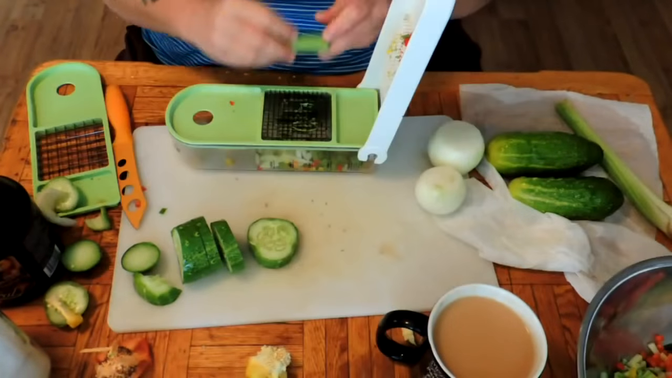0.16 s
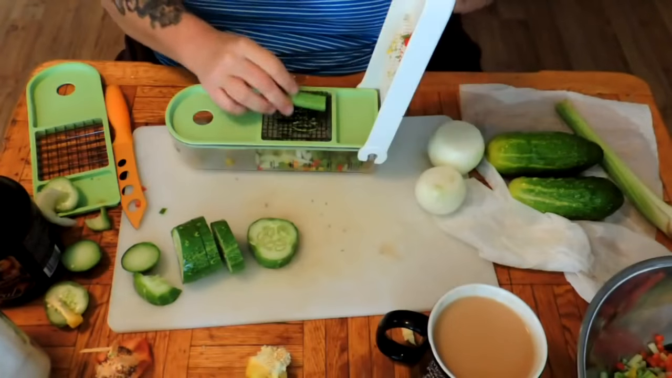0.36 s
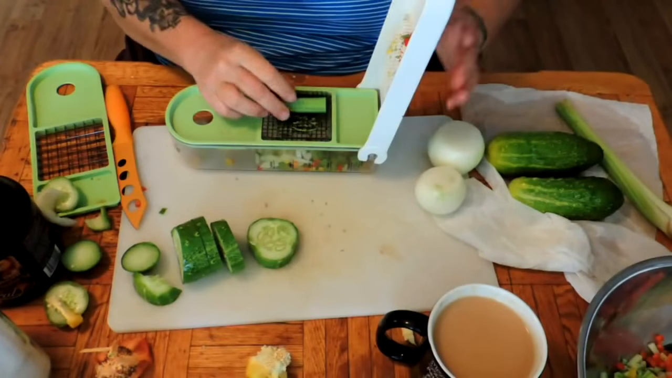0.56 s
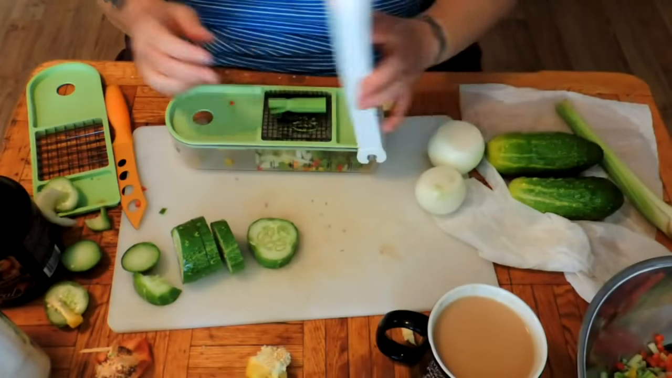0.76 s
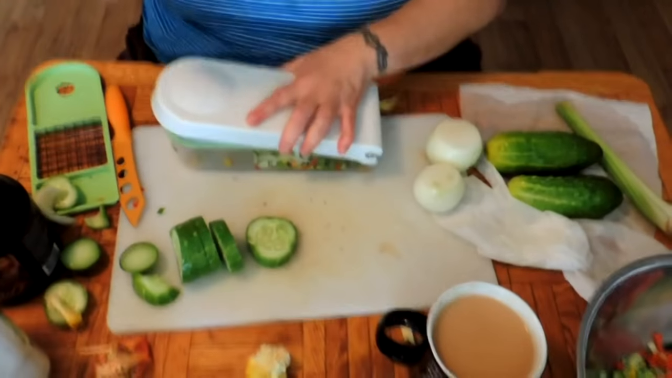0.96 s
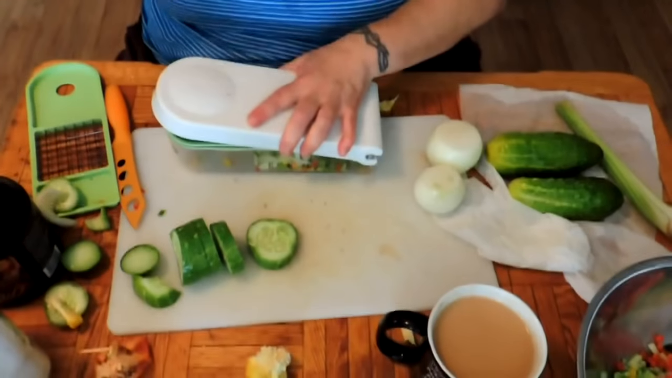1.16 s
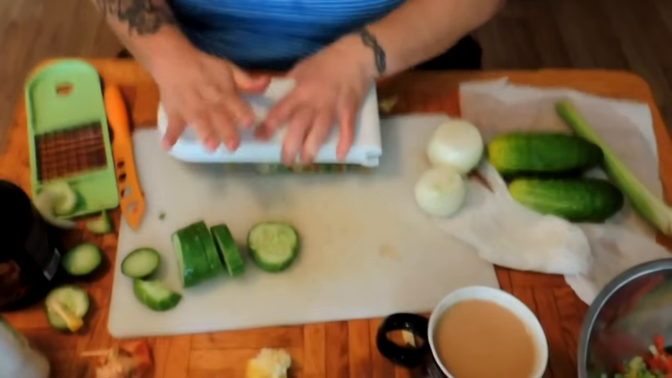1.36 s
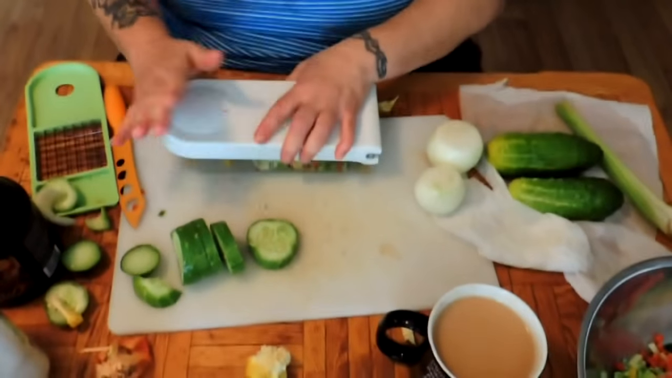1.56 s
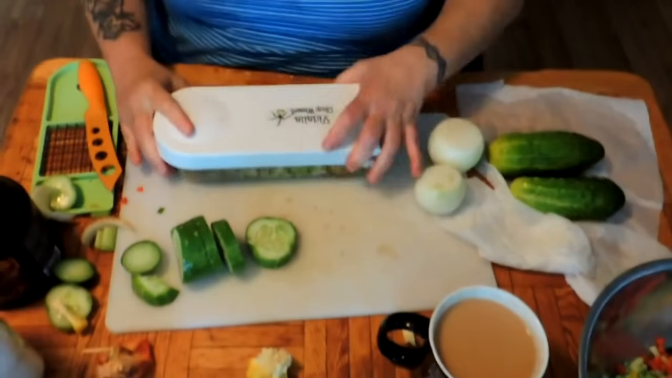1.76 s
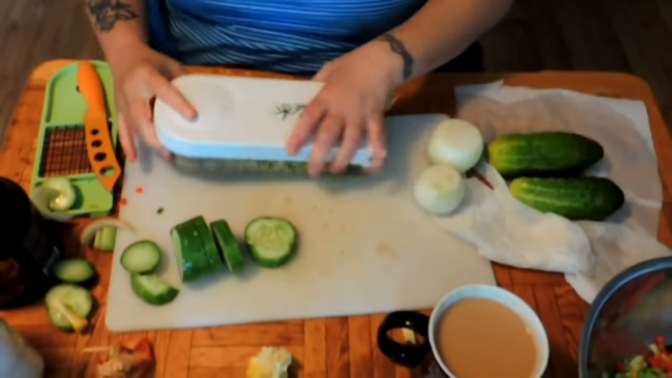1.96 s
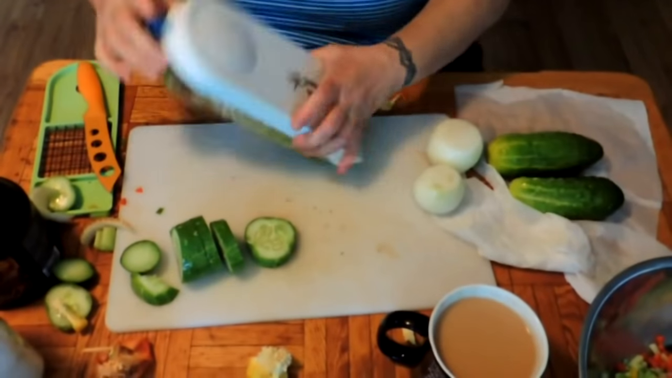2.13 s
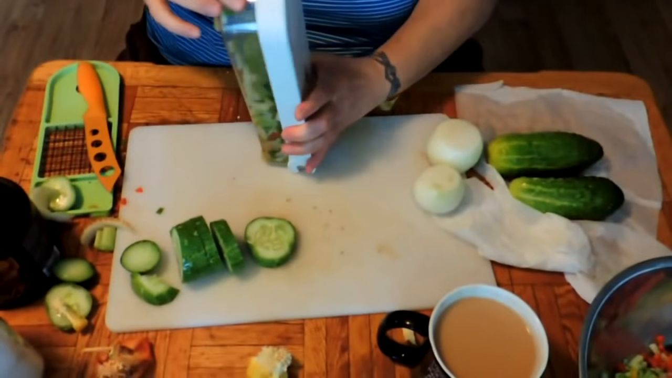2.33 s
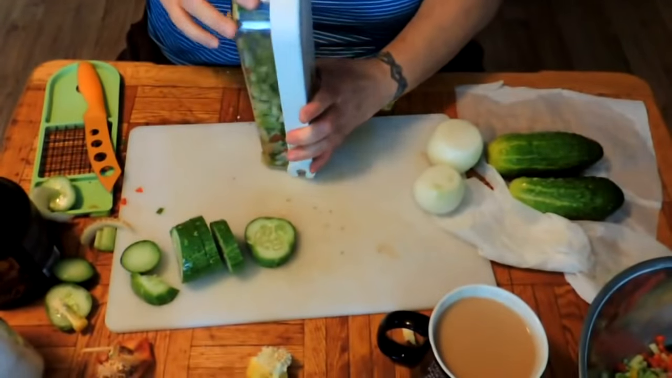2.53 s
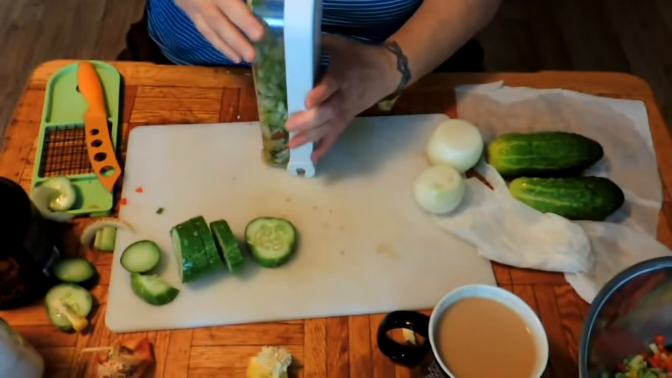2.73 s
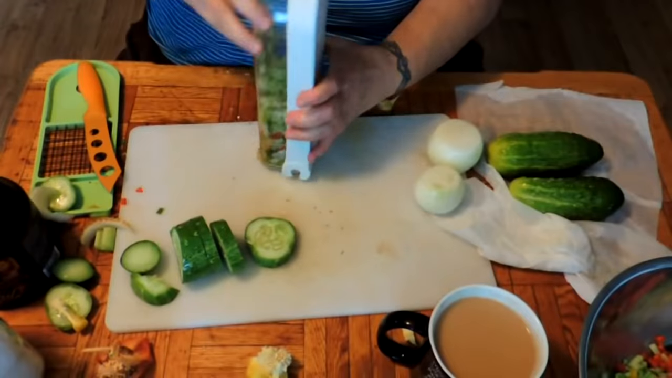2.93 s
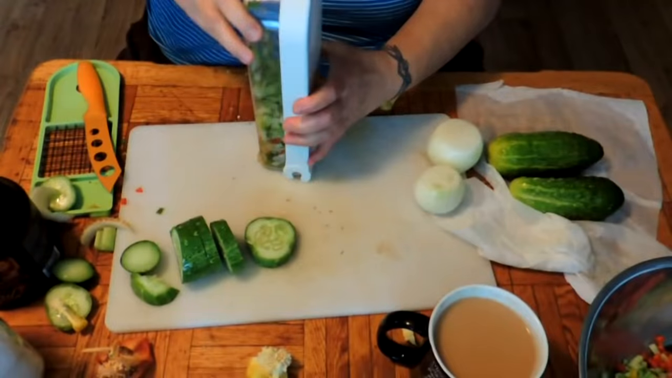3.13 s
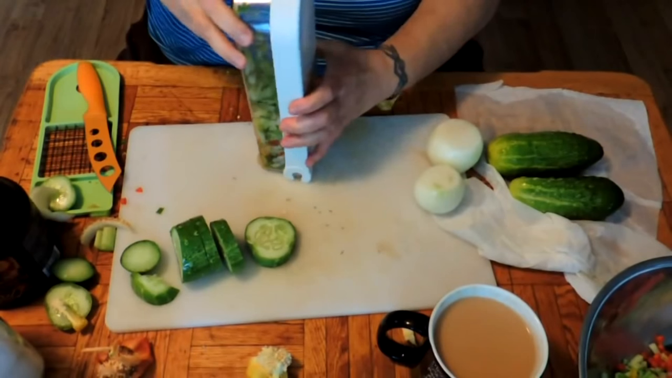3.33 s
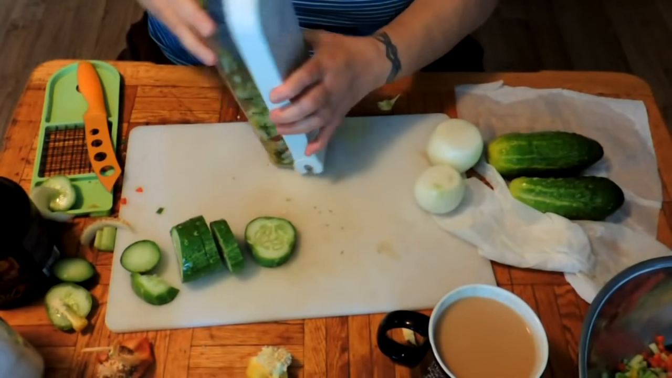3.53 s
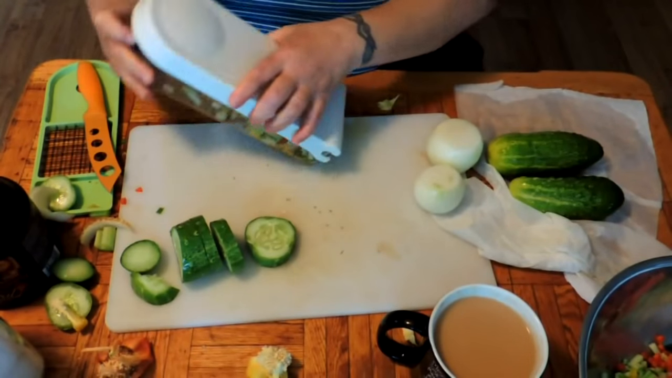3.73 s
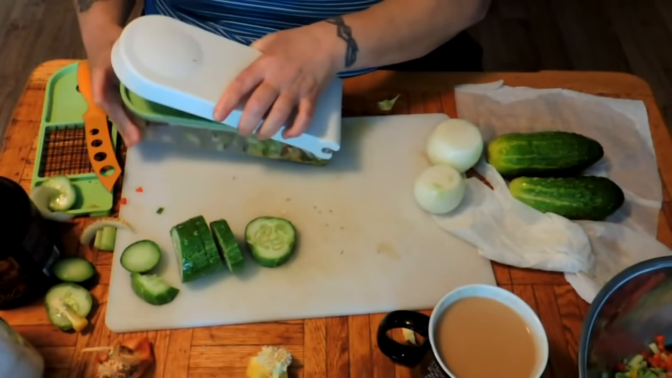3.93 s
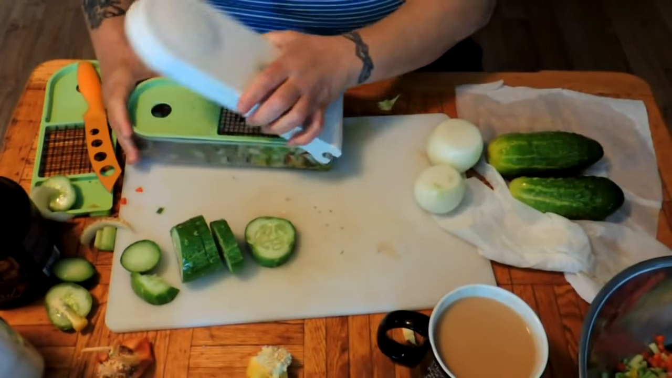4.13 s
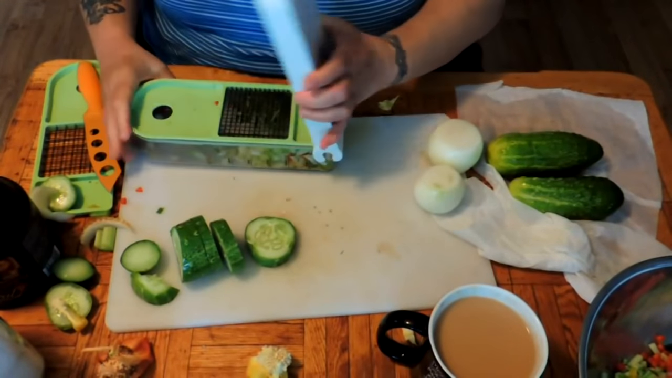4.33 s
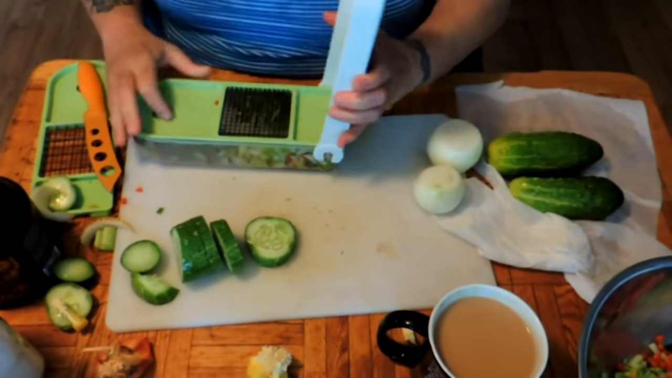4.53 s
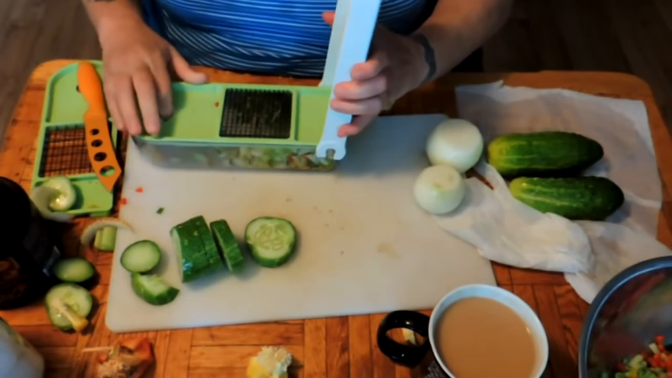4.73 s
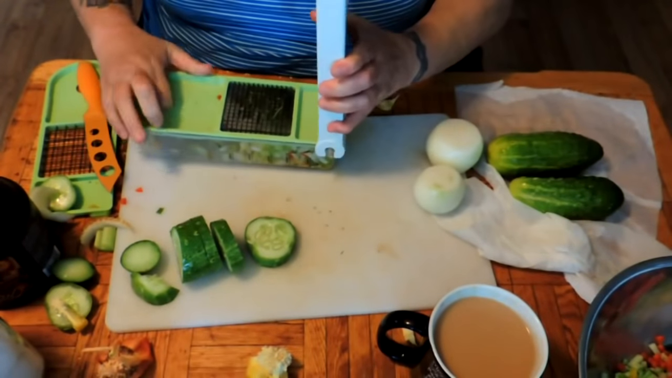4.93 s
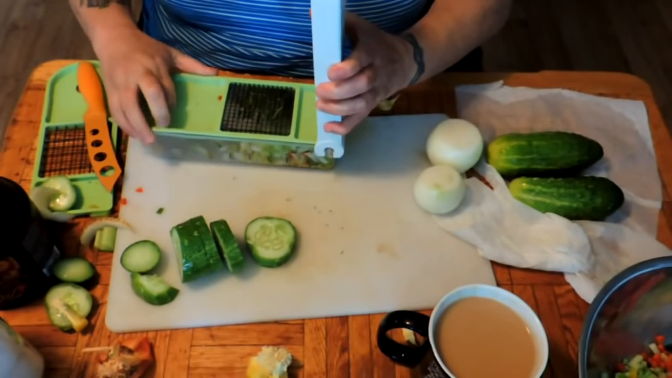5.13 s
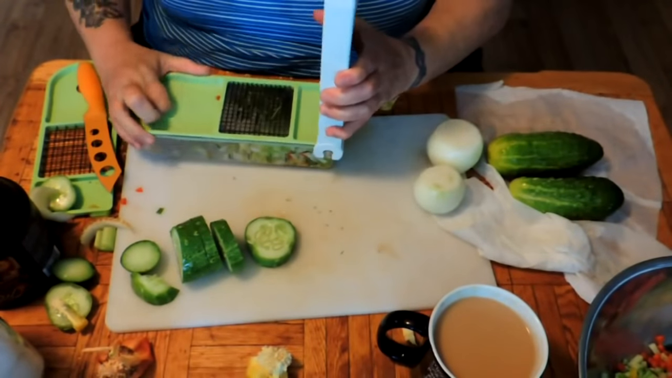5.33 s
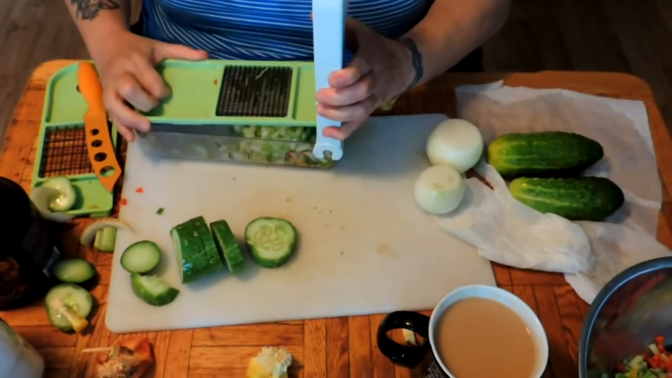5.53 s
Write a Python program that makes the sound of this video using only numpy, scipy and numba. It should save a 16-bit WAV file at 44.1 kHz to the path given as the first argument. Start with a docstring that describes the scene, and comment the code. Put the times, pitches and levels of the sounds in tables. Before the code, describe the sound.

A few hollow plastic clacks lead into a hard slam and a short wet crunch as a vegetable chopper cuts cucumber. The lid is slapped shut even harder, distorting the microphone and dipping its level for a moment. Lighter knocks on a cutting board, low table thuds and small clicks follow as the box is tipped and opened. A fan whirs throughout, and the kitchen adds a short echo.

```python
"""Vegetable chopper in a kitchen

A plastic chopper stands on a cutting board while a fan hums. The lid drops on a piece of cucumber, is
slammed down to push it through the blade grid, and is slapped shut. The box is knocked on its end, set
down and opened. Each blow makes the box ring, the thin plastic chatter and the table rock.
The loud blows overload the microphone and briefly turn its level down."""
import sys
import numpy as np
from scipy import signal
from scipy.fft import rfft, irfft
from scipy.io import wavfile
from numba import njit

SR = 44100
rng = np.random.default_rng(int(sys.argv[2]) if len(sys.argv) > 2 else 0)


def persist_wave(psi):
    """Save psi, clipped to +-1, as 16-bit WAV."""
    counts = np.round(np.clip(psi, -1, 1) * 32767).astype(np.int16)
    wavfile.write(sys.argv[1], SR, np.atleast_2d(counts).T)


N = 246152
TIME = np.arange(N) / SR

# lid and box hit each other or the board: t/s, force/dB, knock pitch/Hz, clack pitch/Hz, hardness/dB
BLOWS = [ (0.845, -19.5, 800, 910, -7), (0.961, -22, 800, 830, -4), (1.003, -32, 815, 850, -16),
         (1.048, -10.5, 530, 2600, 3.5), (1.056, -2, 464, 2300, 5.5), (1.7947, 16.5, 410, 1770, 4),
         (2.094, -29.5, 296, 2200, -18), (2.398, -9, 320, 2490, -28), (2.999, -28.5, 270, 950, -21),
         (3.043, -31, 300, 2150, -9), (3.058, -15.5, 290, 935, -20), (3.135, -5, 254, 1680, 4.5),
         (3.222, -23.5, 270, 2430, -1), (4.791, -40.5, 810, 1880, 19), (4.938, -25.5, 620, 1390, -11),
         (5.127, -21.5, 580, 1180, -12), (5.406, -30.5, 560, 1480, -30)]
# tone of snapping plastic and tearing cucumber: f/Hz, level/dB
SNAP_TONE = [(150, -48.5), (600, -12.5), (2000, -3), (3600, 0.5), (5000, 0), (8500, 0.5), (11000, -2),
             (14000, -8), (16000, -32.5)]

CHOP_S = 1.417   # the palm slaps the lid
RAM_S, RAM_DB = CHOP_S + 0.00402, 12   # the lid rams the cucumber
THROUGH_S, THROUGH_DB = CHOP_S + 0.016, 13   # the skin gives way


def chop(ram_hz=225, through_hz=303, grid_hz=1550, grid_fade_s=0.22, tear_rise_s=0.0011):
    """A slap, a dull ram, then the cucumber tears through the rattling grid; gives (ring, chatter)."""
    ring, chatter = np.zeros((2, 2, N))
    t = TIME[:SR // 3]
    grid_fade = dying(t, grid_fade_s)
    add(chatter, CHOP_S, from_db(-6.5) * snap(t) * dying(t, fade_s=0.11))
    add(ring, RAM_S, from_db(RAM_DB) * knock(t, ram_hz))
    add(chatter, RAM_S, from_db(-7.5) * clack(t, grid_hz, ram_hz) * grid_fade)
    add(ring, THROUGH_S, from_db(THROUGH_DB) * knock(t, through_hz))
    add(chatter, THROUGH_S, from_db(-1.5) * clack(t, grid_hz, through_hz) * grid_fade)
    tear_shape = (1 - np.exp(-t / tear_rise_s)) * dying(t, fade_s=0.16)
    add(chatter, THROUGH_S, from_db(8) * crackle(t) * tear_shape)
    return np.array([ring, chatter])


def box_blows(bounce_db=-4.5):
    """Each blow and its one bounce ring the box and shake the thin plastic; gives (ring, chatter)."""
    ring, chatter = np.zeros((2, 2, N))
    t = TIME[:SR // 3]
    for s, force_db, knock_hz, clack_hz, hardness_db in BLOWS:
        clack_gain = from_db(-2 + 0.75 * force_db + 0.23 * hardness_db)
        snap_gain = from_db(-11 + force_db + hardness_db)
        chatter_s = 0.058 * from_db(0.11 * force_db - 0.19 * hardness_db)   # longer if heavy and soft
        bounce_s = 0.0087 * from_db(0.33 * force_db)   # later if heavy
        for start, gain in ((s, 1), (s + bounce_s, from_db(bounce_db))):
            add(ring, start, gain * from_db(force_db) * knock(t, knock_hz))
            plastic = clack_gain * clack(t, clack_hz, knock_hz) + snap_gain * snap(t)
            add(chatter, start, gain * plastic * dying(t, chatter_s))
    return np.array([ring, chatter])


def knock(t, centre_hz, chance_db=4):
    """The box rings with many tones; the spot that is hit favours those near one pitch."""
    # tones of the box on its board: f/Hz, level/dB, fade time/s
    box_tones = [(236.3, 1, 0.049), (254.8, -2, 0.11), (287, -1, 0.08), (319, -2.5, 0.071),
                 (374.3, 0.5, 0.13), (456.4, -8, 0.09), (480, 0, 0.057), (575.5, -14.5, 0.25),
                 (686, -4, 0.066), (822.5, -9.5, 0.2), (880, -5.5, 0.13), (957, -11.5, 0.083),
                 (1063, -14.5, 0.051), (1344, -4, 0.062), (1636, -5, 0.05), (1758, -8, 0.11),
                 (2215, -9.5, 0.045)]
    hz, level_db, fade_s = np.array(box_tones).T
    octaves = np.log2(hz / centre_hz)
    falloff_db = np.where(octaves < 0, 24, -9) * octaves
    gains = from_db(level_db + falloff_db + chance_db * rng.standard_normal(len(hz)))
    signs = rng.choice([-1, 1], len(hz))   # which way each tone swings at that spot
    rings = np.sin(2 * np.pi * hz[:, None] * t) * dying(t, fade_s[:, None])
    return (signs * gains) @ rings / np.sqrt(np.sum(gains ** 2) / 2)


def clack(t, centre_hz, knock_hz, lift_db=6, width_octaves=0.33):
    """The crowded tones of thin plastic blur into noise, lifted where the struck panel rings."""
    # tone of the thin plastic: f/Hz, level/dB
    plastic_tone = [(100, -54), (220, -18), (430, 1.5), (660, -3.5), (900, -2), (1600, -7.5), (2400, -14),
                    (3300, -19), (6000, -28), (15000, -37)]
    hz = np.geomspace(100, 16000, 80)
    panel_db = lift_db * np.exp(-(np.log2(hz / centre_hz) / width_octaves) ** 2)
    bass_cut_db = 9 * np.minimum(np.log2(hz / knock_hz), 0)
    return noise(np.column_stack([hz, at_hz(plastic_tone, hz) + panel_db + bass_cut_db]), len(t))


def snap(t):
    """The plastic's edges meet with a bright, grainy crack."""
    return noise(SNAP_TONE, len(t)) * grain(t, per_s=1100, spread_db=3.5)


def crackle(t):
    """Wet cucumber breaks in many tiny cracks."""
    return noise(SNAP_TONE, len(t)) * grain(t, per_s=1200, spread_db=4)


def sliding_dice():
    """Diced cucumber slides in the tipped box with short swells of wet crackle."""
    # the slides: t/s, level/dB, length/s
    slides = [(2.928, -46, 0.54), (3.377, -37, 0.017), (3.59, -44.5, 0.094), (4.669, -41.5, 0.016),
              (4.696, -40.5, 0.014)]
    out, t = np.zeros((2, N)), TIME[:SR // 4]
    for s, level_db, length in slides:
        swell = np.sqrt(np.sin(np.pi * np.minimum(t / length, 1)).clip(0))
        add(out, s, from_db(level_db) * swell * crackle(t))
    return out


def table_thuds(rise_s=0.014):
    """The chop, the blows and soft bumps each rock the table for a few swings."""
    # low tones of the table: f/Hz, level compared with the blow/dB
    table_tones = [(55, -27), (88, -28.5), (146, -33.5)]
    # hands and box bump the table: t/s, level/dB, f/Hz
    bumps = [(0.386, -31.5, 99), (1.353, -26.5, 99), (2.086, -20, 58), (3.781, -26.5, 110),
             (4.301, -31, 64.7), (4.55, -26.5, 70), (5.343, -28.5, 59.7)]
    out, t = np.zeros((2, N)), TIME[:SR // 4]
    pushes = [(RAM_S, RAM_DB), (THROUGH_S, THROUGH_DB)] + [blow[:2] for blow in BLOWS]
    rocks = [(s, force_db + tone_db, hz) for s, force_db in pushes for hz, tone_db in table_tones]
    # the arm drives the board against the table, then its weight lands once the lid is down
    arm_thuds = [(RAM_S, -3.5, 148.4), (CHOP_S + 0.04, -10.5, 87)]
    swell = t / rise_s * np.exp(1 - t / rise_s)
    for s, level_db, hz in rocks + arm_thuds + bumps:
        add(out, s, from_db(level_db) * swell * np.sin(2 * np.pi * hz * t))
    return out


def kitchen_echo(sound, first_echo_s=0.0083):
    """The room returns a wash of echoes; each band of pitch dies away at its own speed."""
    # the kitchen's echo: f/Hz, level/dB, fade time/s
    room = [(100, 5, 0.66), (294, -1, 0.24), (686, -4.5, 0.33), (1510, -4.5, 0.35), (4000, -7.5, 0.33),
            (9000, -8.5, 0.37), (15000, -4, 0.21)]
    t, echoes = TIME[:SR // 2], 0
    edges = np.geomspace(80, 18000, 9)
    for low, high in zip(edges, edges[1:]):
        hz = np.sqrt(low * high)
        band_filter = signal.butter(2, [low, high], "band", fs=SR, output="sos")
        band = signal.sosfilt(band_filter, noise([(1, 0)], len(t)))
        fade = dying(t, at_hz(room, hz, column=2)) * (t > first_echo_s)
        echoes = echoes + from_db(at_hz(room, hz)) * band * fade / np.sqrt(np.sum(fade ** 2))
    return signal.fftconvolve(sound, echoes, axes=1)[:, :N]


def fan(rush_db=-35.5, waver_radians=0.3):
    """Air rushes steadily over a motor hum that wavers a little."""
    # tone of the rushing air: f/Hz, level/dB
    air_tone = [(20, 8.5), (60, 2), (130, -3), (190, -7), (270, 0.5), (370, -3.5), (500, -6), (780, -5),
                (1100, -12), (1600, -14.5), (2600, -19.5), (5000, -23), (8000, -25), (12500, -26),
                (15000, -34.5)]
    # tones of the motor: f/Hz, level/dB
    motor_tones = [(59, -53), (120, -49.5), (240, -47), (291, -50), (360.2, -42.5), (747.6, -50),
                   (805, -61.5), (1495.4, -55.5), (1553.2, -57)]
    out = from_db(rush_db) * noise(air_tone, N)
    turns = np.linspace(0, TIME[-1], 40)
    for hz, level_db in motor_tones:
        phase = 2 * np.pi * (hz * TIME + rng.random())
        waver = waver_radians * np.interp(TIME, turns, rng.standard_normal(len(turns)))
        out += np.sqrt(2) * from_db(level_db) * np.sin(phase + waver)
    return out


def noise(tone, size):
    """Stereo noise of strength 1, shaped by rows of f/Hz, level/dB."""
    # how alike left and right sound: f/Hz, likeness (1 = the same)
    likeness = [(30, 0.35), (90, 0.52), (200, 0.98), (400, 0.99), (800, 0.86), (1400, 0.69), (2500, 0.21),
                (5000, -0.087), (12000, 0.12)]
    hz = np.fft.rfftfreq(size, 1 / SR)
    alike = np.clip(at_hz(likeness, hz), -1, 1)
    mid, side = rfft(rng.standard_normal((2, size)))
    both = np.sqrt(1 + alike) * mid + np.sqrt(1 - alike) * side * [[1], [-1]]
    sound = irfft(both * from_db(at_hz(tone, hz)), size)
    return sound / sound.std()


def grain(t, per_s, spread_db):
    """The uneven strength of tiny slips and cracks."""
    slips = np.interp(t * per_s, np.arange(len(t)), rng.standard_normal(len(t)))
    gain = from_db(spread_db * np.clip(slips, -2, 2))
    return gain / np.sqrt(np.mean(gain ** 2))


def from_db(db):
    """Turn decibels into a multiplier."""
    return 10 ** (np.asarray(db) / 20)


def at_hz(rows, hz, column=1):
    """Read between a table's rows, with octaves evenly spaced."""
    table = np.array(rows)
    return np.interp(np.log(hz + 1e-9), np.log(table[:, 0]), table[:, column])


def dying(t, fade_s):
    """A fade that loses 60 dB in the fade time."""
    return np.exp(-np.log(1000) * t / fade_s)


def add(out, s, sound):
    """Mix a sound in, starting at s seconds."""
    start = round(s * SR)
    out[:, start:start + sound.shape[-1]] += sound[..., :N - start]


def scene(left_db=-1.7, right_db=0.53, ring_echo_db=-9, bass_cut_hz=190):
    """The chopper stands a little to the right; its thin panels stir more echo than its base."""
    ring, chatter = box_blows() + chop()
    # a box this small gives off little bass
    bass_cut = signal.butter(4, bass_cut_hz, "high", fs=SR, output="sos")
    ring = signal.sosfilt(bass_cut, ring + 1e-18)
    bright = chatter + sliding_dice()
    echo = kitchen_echo(bright + from_db(ring_echo_db) * ring)
    thuds = table_thuds() * from_db([[-2], [2]])   # left, right
    air = fan() * from_db([[-0.13], [0.13]])
    return (ring + bright + echo + thuds + air) * from_db([[left_db], [right_db]])


@njit
def ducking(peak_db, limit_db, attack_s, hold_s, release_db_per_s):
    """A level change in dB: it sinks while the sound is too loud, waits, then creeps back."""
    out, gain_db, waited = np.zeros(len(peak_db)), 0., 0.
    for i in range(len(peak_db)):
        over_db = peak_db[i] + gain_db - limit_db
        waited += 1
        if over_db > 0:
            gain_db -= over_db / (attack_s * SR)
            waited = 0.
        elif waited > hold_s * SR:
            gain_db = min(0., gain_db + release_db_per_s / SR)
        out[i] = gain_db
    return out


def record(dry, start_db=-15, treble_cut_hz=14250):
    """The microphone opens after a moment and turns loud blows down; what gets past overloads it."""
    dry = dry * from_db(np.interp(TIME, [0.039, 0.043], [start_db, 0]))
    peak_db = 20 * np.log10(np.abs(dry).max(axis=0) + 1e-9)
    duck_db = ducking(peak_db, limit_db=-1.5, attack_s=0.011, hold_s=0.37, release_db_per_s=19)
    ducked = dry * from_db(duck_db)
    squashed = ducked / (1 + ducked ** 6) ** (1 / 6)   # overload rounds off the peaks
    treble_cut = signal.ellip(12, 0.2, 90, treble_cut_hz, fs=SR, output="sos")
    return signal.sosfilt(treble_cut, squashed)


dry = scene()
out = record(dry)
persist_wave(out)
```